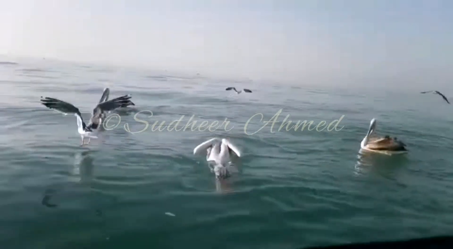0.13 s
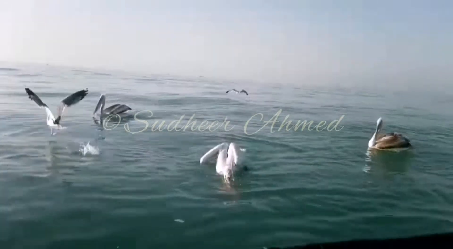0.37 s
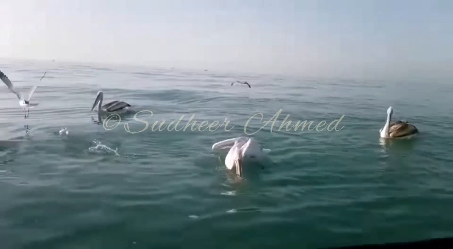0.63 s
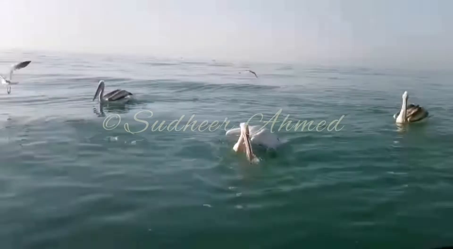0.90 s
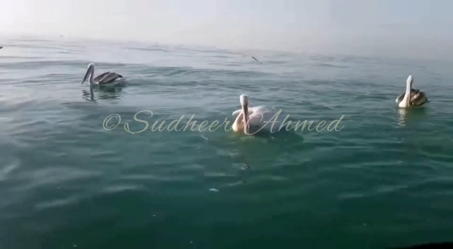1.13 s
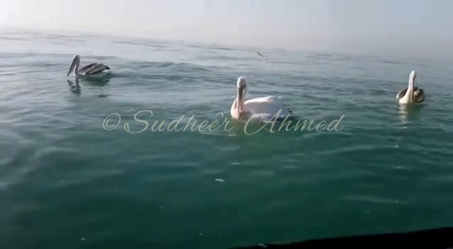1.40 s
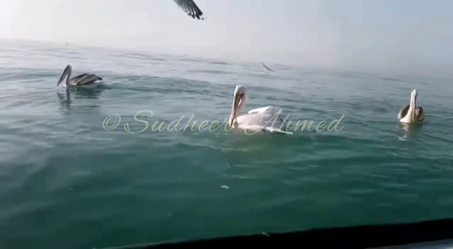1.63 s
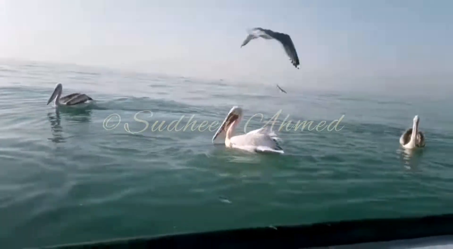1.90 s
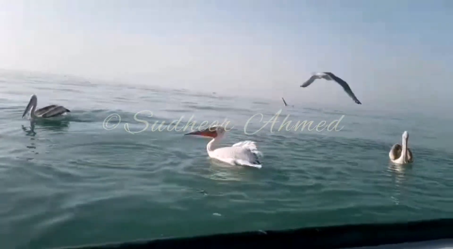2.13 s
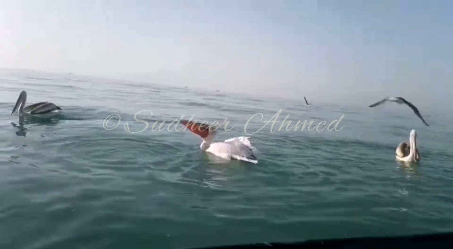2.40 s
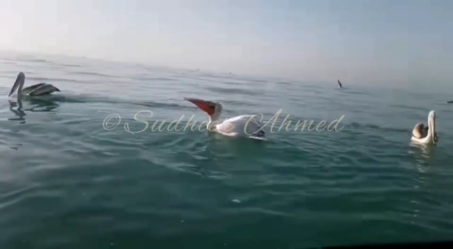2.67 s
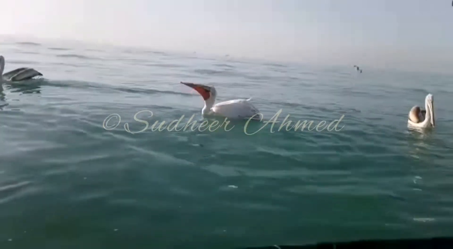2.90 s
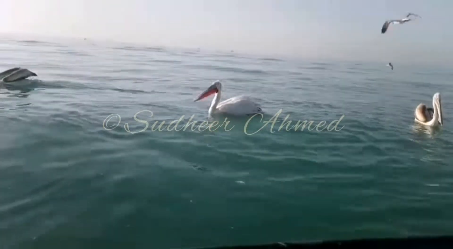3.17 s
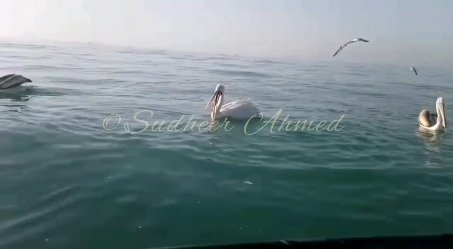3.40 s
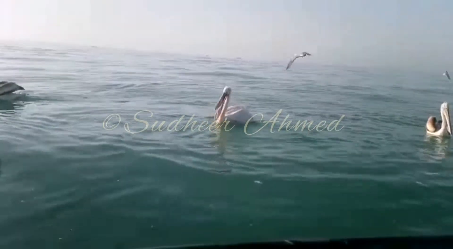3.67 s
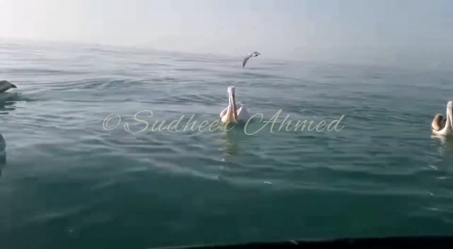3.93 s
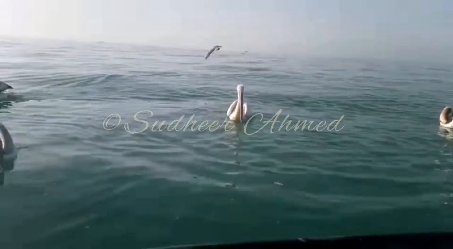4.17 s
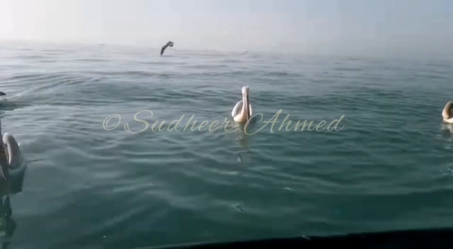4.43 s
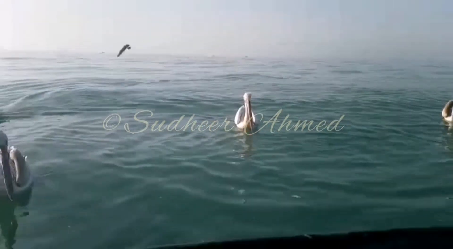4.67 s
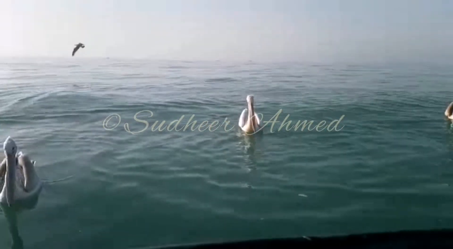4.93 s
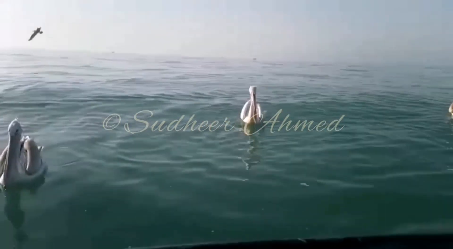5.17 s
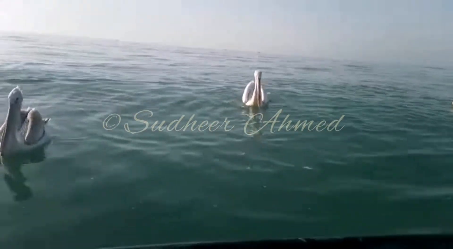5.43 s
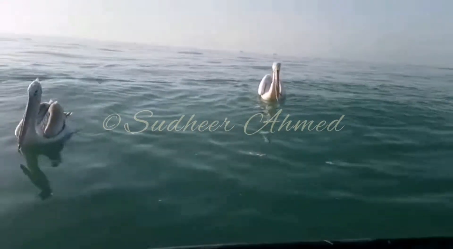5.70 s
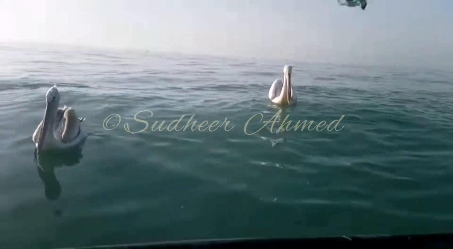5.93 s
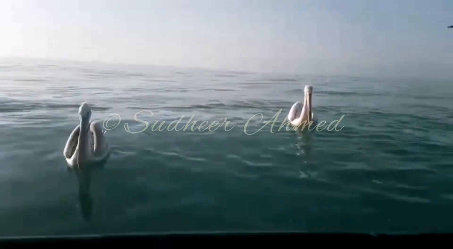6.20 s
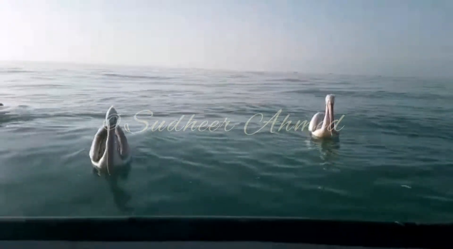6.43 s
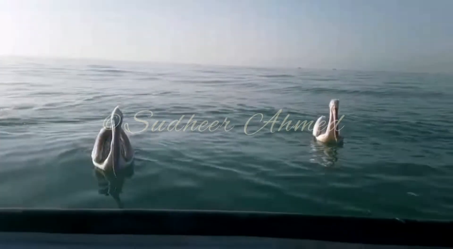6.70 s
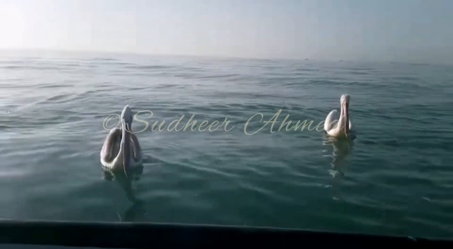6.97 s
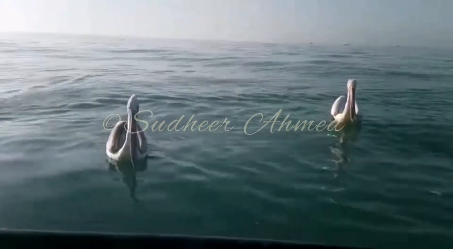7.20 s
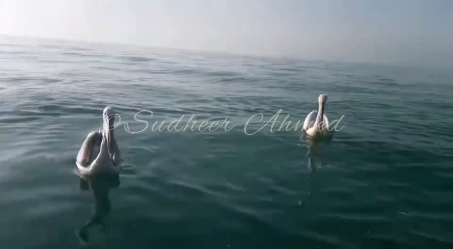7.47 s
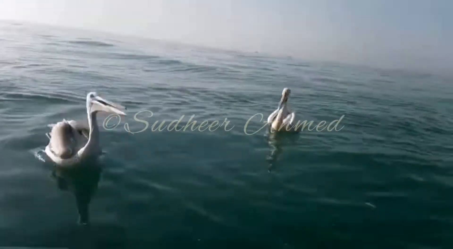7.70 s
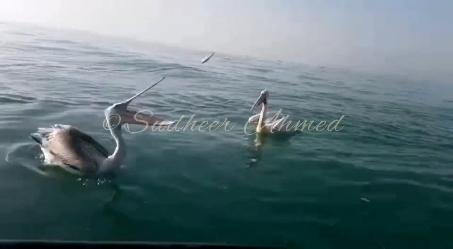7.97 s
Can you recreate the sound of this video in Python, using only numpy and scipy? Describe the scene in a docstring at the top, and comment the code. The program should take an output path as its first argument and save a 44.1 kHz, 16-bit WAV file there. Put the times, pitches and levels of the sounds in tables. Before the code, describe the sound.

Small waves slap and gurgle against a small boat's hull, with crackling spray, low wooden booms and one brief thin gull squeal.

```python
"""Small waves wash along a small boat on a calm sea: filtered noise hisses far off and rumbles in the hull.
From the start spray crackles and trapped bubbles gurgle: random clicks ring short sines.
Drops smack the planks (noise bursts), slaps pop bubbles, then the hull booms (dying sines).
After three seconds a gull squeals once, in gliding hoarse tones; the water goes on to the end.
One microphone feeds both channels."""
import sys
import numpy as np
from scipy import signal
from scipy.io import wavfile

SR = 44100
rng = np.random.default_rng(int(sys.argv[2]) if len(sys.argv) > 2 else 0)


def store_pcm(level_fs):
    """Save levels as 16-bit WAV."""
    pcm = np.round(np.clip(level_fs, -1, 1) * 32767).astype(np.int16)
    wavfile.write(sys.argv[1], SR, np.atleast_2d(pcm).T)


def rack_gain(trim_db):
    """Turn a fader trim in dB into the linear factor to multiply a signal by."""
    fader = np.asarray(trim_db, float)
    return 10 ** (fader / 20)


N = 356680


def rms_one(x):
    """Scale to unit rms."""
    return x / np.sqrt(np.mean(x ** 2) + 1e-20)


def cut(x, hz, kind, order=4):
    """Butterworth filter."""
    return signal.sosfilt(signal.butter(order, hz, kind, fs=SR, output="sos"), x)


def add(out, start_s, sound):
    """Mix a sound in from start_s."""
    i = round(start_s * SR)
    out[i:i + len(sound)] += sound[:N - i]


def drift(rate_hz):
    """Slow noise of unit rms: two equal poles at rate_hz, run at SR / 40."""
    r = np.exp(-80 * np.pi * rate_hz / SR)
    white = rng.standard_normal(N // 40 + 2002)
    slow = signal.lfilter([1], [1, -2 * r, r * r], white)[2000:]  # settled part
    return np.interp(np.arange(N) / 40, np.arange(len(slow)), rms_one(slow))


def coloured(x, spectrum, patchy_db, rate_hz):
    """Third-octave bank following a spectrum; each band swells and fades on its own."""
    hz, level_db = np.transpose(spectrum)
    edges_hz = 25 * 2 ** np.arange(0, 9.5, 1 / 3)
    out = np.zeros(N)
    for k, (low, high) in enumerate(zip(edges_hz, edges_hz[1:])):
        if hz[0] < low < hz[-1]:
            band_db = np.interp(np.log(low * high) / 2, np.log(hz), level_db)
            gain = rack_gain(band_db + patchy_db * drift(rate_hz))
            out += (-1) ** k * gain * cut(x, [low, high], "band", order=2)
    return out


def burst(rise_s, fall_s):
    """Envelope of height 1: a smooth rise, an exponential fall."""
    t = np.arange(int((rise_s + 8 * fall_s) * SR)) / SR
    rise = np.sin(np.pi / 2 * np.minimum(t / rise_s, 1)) ** 2
    return rise * np.exp(-np.maximum(t - rise_s, 0) / fall_s)


def bubble(hz, rise_s, t60_s, glide):
    """A swelling, then dying sine of envelope height 1; its pitch climbs from hz."""
    shape = burst(rise_s, t60_s / np.log(1000))
    t = np.arange(len(shape)) / SR
    return shape * np.sin(2 * np.pi * hz * (t + glide * t ** 2 / (2 * t60_s)))


def ring(clicks, hz, t60_s):
    """Two-pole resonator: a unit click rings a dying sine that starts at height 1."""
    r, w = rack_gain(-60 / (t60_s * SR)), 2 * np.pi * hz / SR
    return signal.lfilter([0, np.sin(w)], [1, -2 * r * np.cos(w), r * r], clicks + 1e-18)


def grains(per_s, spread_db, clump_db):
    """Random clicks of uneven size that come in clumps."""
    sizes = rack_gain(spread_db * np.minimum(rng.exponential(1, N), 5)) * rng.choice([-1, 1], N)
    return sizes * (rng.random(N) < per_s * rack_gain(clump_db * drift(25)) / SR)


def froth(per_s, low_hz, high_hz, cycles, tilt):
    """Many small bubbles, each ringing for some cycles at one of 16 pitches; rms 1."""
    clicks = grains(per_s, spread_db=3.5, clump_db=4.0)
    dealt = rng.integers(0, 16, N)
    out = np.zeros(N)
    for k, hz in enumerate(np.geomspace(low_hz, high_hz, 16)):
        out += ring(clicks * (dealt == k), hz, cycles / hz) * (hz / low_hz) ** tilt
    return rms_one(out)


def surge_db(rows, column, ebb_db_per_s, calm_db, hold_share=1):
    """Level in dB: each surge climbs to its crest, holds, then ebbs; surges and calm add in power."""
    t = np.arange(0, N / SR + .01, .002)
    power = np.full(len(t), rack_gain(2 * calm_db))
    for row in rows:
        crest_s, build_s, hold_s = row[:3]
        climb_db = 19.5 * np.maximum(crest_s - t, 0) / max(build_s, .005)
        fall_db = ebb_db_per_s * np.maximum(t - crest_s - hold_share * hold_s, 0)
        power = power + rack_gain(2 * (row[column] - climb_db - fall_db))
    return np.interp(np.arange(N) / SR, t, 10 * np.log10(power))


# far sea, relative density: (frequency [Hz], level [dB per Hz])
SEA_SPECTRUM = [(30, -1), (629, -6.5), (1150, -16), (6290, -36), (15900, -72)]


def sea():
    """Far hiss: noise whose bands flicker independently."""
    noise = coloured(rng.standard_normal(N), SEA_SPECTRUM, patchy_db=-6.0, rate_hz=16.7)
    return rack_gain(-60.5) * rms_one(noise)


# waves washing along the hull:
# (crest time [s], build-up [s], hold [s], rumble crest [dB], gurgle crest [dB])
WASHES = [(0.09, 0.28, 0.11, -54.5, -57), (0.63, 0.072, 0.26, -44, -52), (0.985, 0.033, 0.17, -37.5, -43.5),
          (1.47, 0.28, 0.0069, -44, -55.5), (1.95, 1, 0.18, -57.5, -67.5), (2.6, 0.31, 0.14, -41.5, -40.5),
          (3.3, 0.36, 0.13, -49, -55.5), (4.02, 0.37, 0.01, -42.5, -54), (4.65, 0.078, 0.14, -45.5, -54.5),
          (5.47, 0.2, 0.027, -46, -47), (5.88, 0.015, 0.0083, -41.5, -74),
          (6.09, 0.033, 0.0094, -41.5, -83), (6.945, 0.036, 0.18, -46.5, -52.5),
          (7.07, 0.14, 0.37, -49.5, -54.5), (7.71, 0.087, 0.87, -55.5, -56.5),
          (8.02, 0.033, 0.084, -44, -69)]


def wash_levels():
    """Rumble and gurgle levels in dB; each wave drives both, the gurgle holds for less time."""
    rumble_db = surge_db(WASHES, 3, ebb_db_per_s=109, calm_db=-65.5)
    gurgle_db = surge_db(WASHES, 4, ebb_db_per_s=79.5, calm_db=-78.5, hold_share=0.53)
    return rumble_db, gurgle_db


# hull rumble, relative density: (frequency [Hz], level [dB per Hz])
RUMBLE_SPECTRUM = [(25, -58), (75, -7), (105, -6.5), (155, 0.5), (250, -12.5), (420, -28.5), (700, -31)]


def hull_rumble(level_db):
    """Low noise: water pushing the planks and a light wind on the microphone."""
    push = rng.standard_normal(N) * rack_gain(1.5 * drift(14))
    return rack_gain(level_db) * rms_one(coloured(push, RUMBLE_SPECTRUM, patchy_db=3.5, rate_hz=5.9))


def gurgle(level_db):
    """Steady gurgling of many small trapped bubbles."""
    out = rack_gain(level_db) * froth(1300, 227.4, 2390, cycles=32, tilt=-0.49)
    return cut(out, 7100, "low", order=2)


# spray hiss, relative density: (frequency [Hz], level [dB per Hz])
SPRAY_SPECTRUM = [(900, 1), (3000, 2.5), (7000, -1.5), (9000, -8.5), (13500, -25.5)]
# showers: (onset time [s], build-up before it [s], hold [s], spray crest [dB], finest mist crest [dB])
SHOWERS = [(0.0, .02, 0.036, -61.5, -71), (0.16, 0.03, 0.012, -48.5, -63), (0.3, 0.077, 0.45, -59.5, -73),
           (0.68, 0.28, 0.69, -66, -99), (1.0, 0.36, 0.12, -57, -70), (1.58, 0.17, 0.15, -58, -64),
           (2.27, 0.37, 0.093, -59, -72), (2.6, 0.24, 0.084, -61.5, -90), (3.7, 0.49, 0.28, -71, -99.5),
           (4.2, 0.94, 0.52, -67.5, -84), (5.2, 0.28, 0.61, -57.5, -79), (5.75, 0.036, 0.014, -63, -65),
           (5.98, 0.34, 0.026, -59.5, -69), (6.33, 0.24, 0.031, -59.5, -76), (7.0, 0.24, 0.076, -65, -97),
           (7.4, 1, 0.11, -65.5, -77), (7.92, 0.39, .2, -61, -75)]


def spray():
    """Droplets crackle, fizz and plink over a hiss, heard again off the boat's side; mist lies on top."""
    crackle = rms_one(grains(2500, spread_db=3.8, clump_db=5)) + .9 * rng.standard_normal(N)
    hiss = rms_one(coloured(crackle, SPRAY_SPECTRUM, patchy_db=3.5, rate_hz=16.8))
    fizz = froth(300, 1458, 7830, cycles=71, tilt=-0.2)
    plinks = froth(90, 3640, 8700, cycles=140, tilt=0.084)
    steady = rms_one(hiss + 0.58 * fizz + 0.27 * plinks)
    echo_s, echo_db = .00095, -9  # before the echo's low-pass
    add(steady, echo_s, rack_gain(echo_db) * cut(steady, 3130, "low", order=2))
    mist = rms_one(cut(crackle, [14500, 15900], "band", order=3)) * rack_gain(3 * drift(9))
    spray_db = surge_db(SHOWERS, 3, ebb_db_per_s=75, calm_db=-78.5)
    mist_db = surge_db(SHOWERS, 4, ebb_db_per_s=162, calm_db=-99)
    return rack_gain(spray_db) * steady + rack_gain(mist_db) * mist


# drops on the planks: (envelope peak time [s], level [dB], centre [Hz], fall time constant [s])
SMACKS = [(0.151, -30, 2480, 0.0012), (0.156, -41, 4100, 0.0078), (0.179, -29, 4100, 0.0022),
          (0.1879, -24.5, 3930, 0.0022), (0.321, -35.5, 4480, 0.0096), (0.404, -36.5, 5300, 0.0087),
          (0.7022, -32, 2500, 0.0027), (0.979, -39.5, 3430, 0.017), (2.3114, -41.5, 4150, 0.0031),
          (2.5737, -42.5, 3600, 0.014), (2.674, -41, 3380, 0.0046), (5.239, -34, 6300, 0.0025),
          (5.277, -41.5, 5840, 0.001), (5.3202, -32, 5650, 0.002), (5.3668, -27, 1400, 0.0014),
          (5.373, -32, 1500, 0.0018), (5.384, -38, 6800, 0.00097), (5.492, -39, 6820, 0.0063),
          (5.55, -37.5, 5750, 0.004), (5.741, -39.5, 4670, 0.0045), (5.7676, -38, 6830, 0.0033),
          (5.993, -38, 6900, 0.0048), (6.2907, -37, 6350, 0.00078), (6.417, -40, 6560, 0.0022),
          (6.814, -42, 6230, 0.0012), (6.929, -45.5, 2420, 0.0053)]


def smacks():
    """Each drop is a short burst of band noise plus a ringing bubble at its centre pitch."""
    rise_s, octaves, ring_share = 0.00111, 1.08, 0.28
    half_band = 2 ** (octaves / 2)
    out, white = np.zeros(N), rng.standard_normal(N)
    for peak_s, level_db, hz, fall_s in SMACKS:
        shape = burst(rise_s, fall_s)
        puff = white[round(peak_s * SR):][:len(shape)] * shape
        band = cut(puff, [hz / half_band, hz * half_band], "band", order=3)
        tone = shape * np.sin(2 * np.pi * hz * np.arange(len(shape)) / SR)
        smack = (1 - ring_share) * band / np.abs(band).max() + ring_share * tone
        add(out, peak_s - rise_s, rack_gain(level_db) * smack)
    return out


# water slapping the side: (time [s], bubble level [dB], bubble start pitch [Hz],
# froth level before its envelope and band filter [dB])
SLAPS = [(0.187, -26.5, 2300, -44.5), (0.649, -38.5, 410, -56), (0.734, -32, 937, -41.5),
         (0.975, -44, 910, -32.5), (1.026, -42, 2560, -46), (1.107, -48, 1180, -54),
         (2.197, -43.5, 1400, -54), (2.484, -35, 670, -42.5), (2.561, -39.5, 1610, -41.5),
         (2.604, -28.5, 876, -37), (2.745, -37, 515, -51.5), (3.792, -49, 940, -44), (3.917, -48, 544, -47),
         (4.762, -45.5, 960, -52), (5.357, -32.5, 1700, -44), (5.465, -45, 790, -40.5),
         (5.55, -39, 1750, -46.5), (5.611, -40.5, 1490, -60), (5.634, -38.5, 880, -68),
         (5.673, -53, 600, -49), (5.709, -45, 1540, -51), (5.725, -47, 1050, -72), (5.85, -46, 1910, -52),
         (6.132, -42, 2100, -76), (6.507, -43, 1760, -53), (7.025, -54, 1110, -43),
         (7.068, -39, 910, -42.5), (7.692, -44.5, 527, -51.5)]


def slaps():
    """A slap pops one big bubble and throws up froth around and above its pitch."""
    out = np.zeros(N)
    foam = froth(1500, 382, 3540, cycles=20, tilt=0.047)
    shape = burst(rise_s=0.0041, fall_s=0.031)
    for start_s, bubble_db, hz, froth_db in SLAPS:
        add(out, start_s, rack_gain(bubble_db) * bubble(hz, rise_s=1.9 / hz, t60_s=36 / hz, glide=0.34))
        own_foam = rms_one(foam[round(start_s * SR):][:len(shape)]) * shape
        add(out, start_s, rack_gain(froth_db) * cut(own_foam, [hz / 2.15, hz + 1300], "band", order=2))
    return cut(out, 7100, "low", order=2)


# waves thumping the hull: (time [s], peak level [dB], start pitch [Hz], swell [s])
THUMPS = [(0.76, -30, 142, 0.014), (0.822, -30.5, 152.5, 0.0091), (0.977, -33.5, 334, 0.003),
          (1.406, -24, 154, 0.027), (2.627, -37.5, 217, 0.0022), (3.26, -35.5, 136, 0.0049),
          (3.411, -29.5, 153, 0.029), (4.644, -35.5, 206, 0.003), (4.824, -41.5, 231, 0.0019),
          (5.878, -36, 219, 0.0071), (6.057, -28, 168.5, 0.0082), (6.933, -32.5, 154, 0.0035),
          (6.96, -42, 186, 0.0023), (7.694, -47, 299, 0.0024), (8.007, -40.5, 298, 0.0029)]


def hull_booms():
    """Single waves make the planks boom: low sines swell and die, rising slightly in pitch."""
    out = np.zeros(N)
    for start_s, peak_db, hz, swell_s in THUMPS:
        add(out, start_s, rack_gain(peak_db) * bubble(hz, rise_s=swell_s, t60_s=0.13, glide=0.069))
    return out


# gull notes, the voice breaking between registers: (start time [s], length [s], first pitch [Hz],
# last pitch [Hz], crest rms level [dB], crest position [share of length])
GULL_NOTES = [(3.234, .036, 3485, 3520, -50, .45), (3.273, .038, 4150, 4250, -59, .4),
              (3.299, .053, 4900, 4840, -57, .3), (3.354, .066, 4870, 4630, -50, .72),
              (3.416, .082, 4580, 4770, -56, .35), (3.494, .054, 5240, 5130, -56, .2),
              (3.546, .063, 4520, 4590, -54, .4), (3.612, .046, 4620, 4520, -51, .72),
              (3.654, .022, 3870, 3810, -59, .5)]


def gull():
    """A thin hoarse whistle; each note swells to a crest, its octave is strongest on low notes."""
    swell_db, hoarse_share = 7, .13
    out, flutter = np.zeros(N), rack_gain(2.0 * drift(60))
    hoarse = rms_one(cut(rng.standard_normal(N), 540, "low"))
    rasp = rms_one(cut(rng.standard_normal(N), [400, 1300], "band", order=2))
    waver = 1 + .006 * drift(40)
    for start_s, length_s, first_hz, last_hz, crest_db, crest in GULL_NOTES:
        i = np.arange(round(start_s * SR), round((start_s + length_s) * SR))
        phase = 2 * np.pi * np.cumsum(np.linspace(first_hz, last_hz, len(i)) * waver[i]) / SR
        edges = np.minimum(1, np.minimum(i - i[0], i[-1] - i) / (.002 * SR))
        knots = [0, np.clip(crest, .05, .95), 1]
        level_db = crest_db + np.interp(np.linspace(0, 1, len(i)), knots, [-swell_db, 0, -swell_db])
        octave = min(rack_gain(-9), rack_gain(-25) * (4450 / first_hz) ** 13)
        rasp_db = -31 + .024 * (first_hz - 4500)  # grows on high notes
        rough = 1 + hoarse_share * hoarse[i] + rack_gain(rasp_db) * rasp[i]
        tone = np.sin(phase) * rough + octave * np.sin(2 * phase)
        out[i] += np.sqrt(2) * rack_gain(level_db) * edges * flutter[i] * tone
    return out


def scene():
    """All sources, the same in both channels."""
    rumble_db, gurgle_db = wash_levels()
    water = sea() + hull_rumble(rumble_db) + gurgle(gurgle_db) + spray()
    mono = water + smacks() + slaps() + hull_booms() + gull()
    return np.stack([mono, mono])


def roll_off(x):
    """The treble ends steeply here."""
    return signal.sosfilt(signal.butter(12, 16610, fs=SR, output="sos"), x)


# resonances of the microphone port: (centre [Hz], width [Hz], level of the band mixed in [dB])
PORT_RESONANCES = [(4300, 900, -2), (6500, 800, 2)]


def record(dry):
    """The microphone port colours the treble; the extremes are cut."""
    out = cut(dry, 55, "high", order=2)
    for hz, width_hz, band_db in PORT_RESONANCES:
        band = cut(out, [hz - width_hz / 2, hz + width_hz / 2], "band", order=1)
        out = out + rack_gain(band_db) * band
    out = signal.sosfilt(signal.ellip(10, 1, 60, 15800, fs=SR, output="sos"), out)
    return roll_off(out)


dry = scene()
out = record(dry)
store_pcm(out)
```